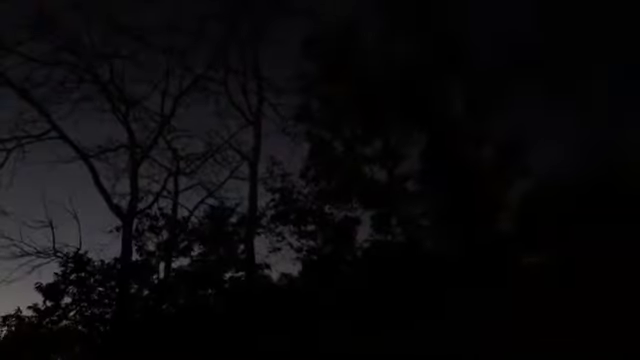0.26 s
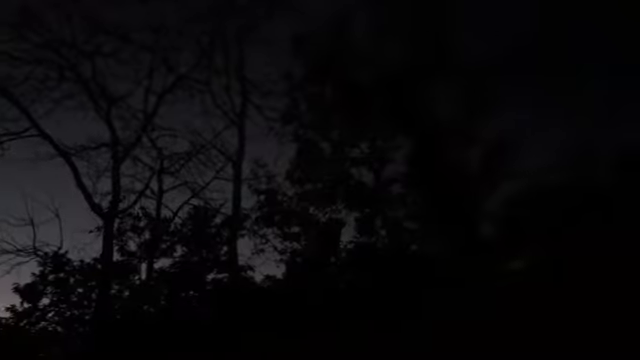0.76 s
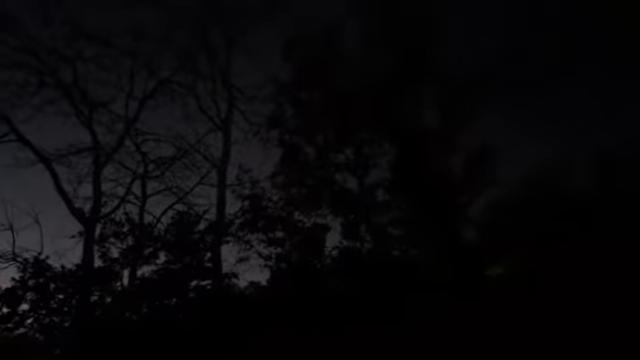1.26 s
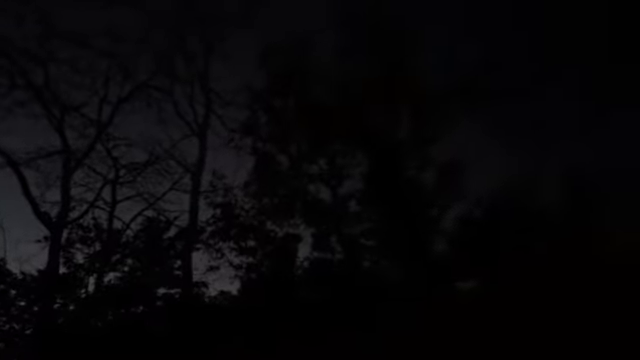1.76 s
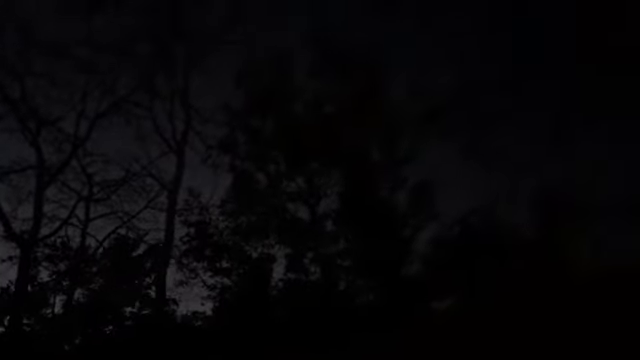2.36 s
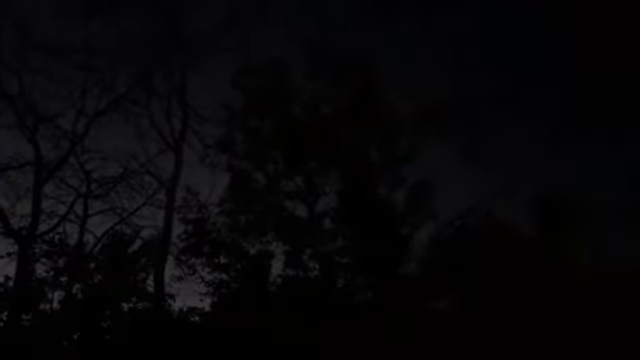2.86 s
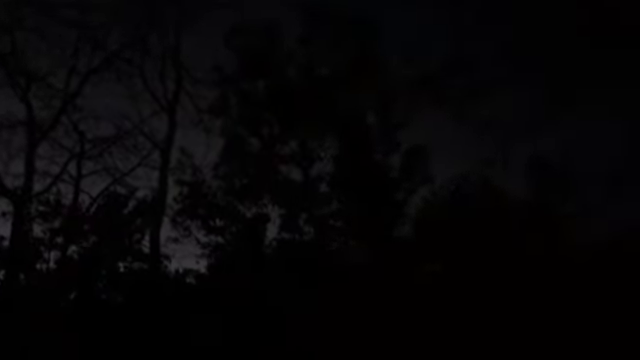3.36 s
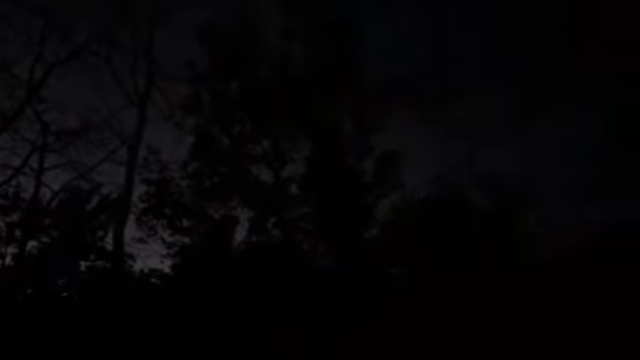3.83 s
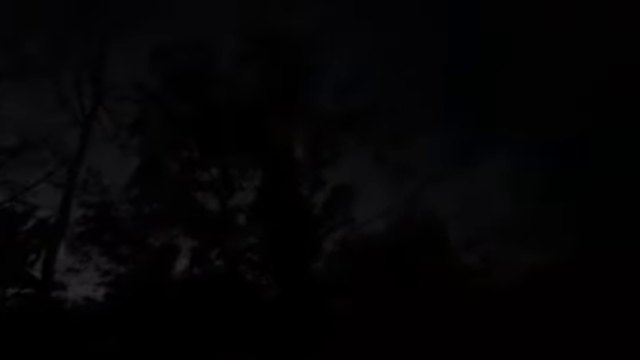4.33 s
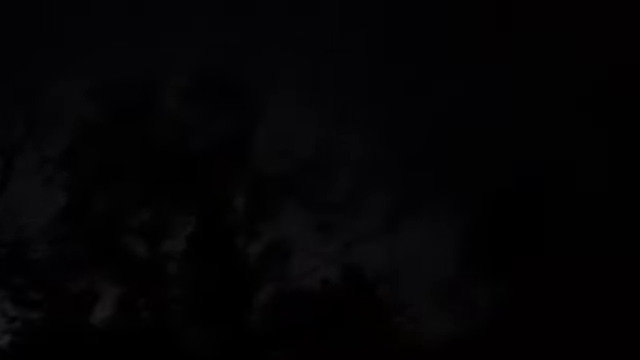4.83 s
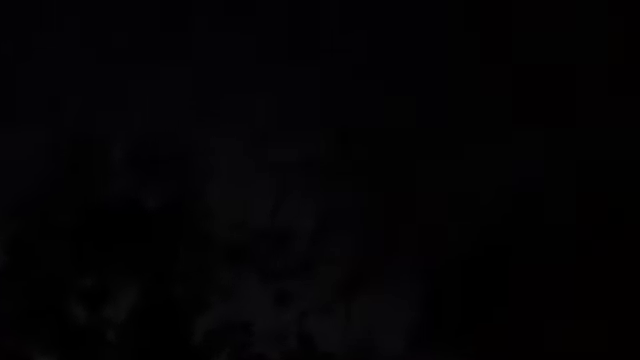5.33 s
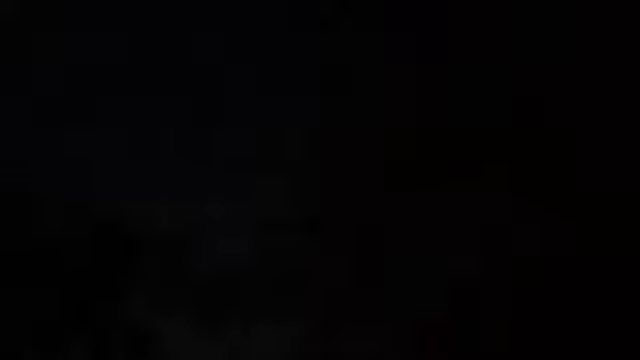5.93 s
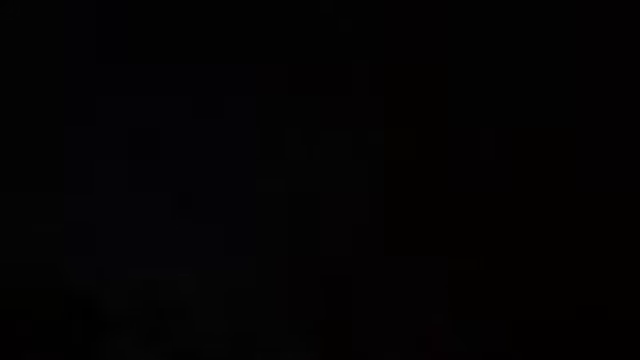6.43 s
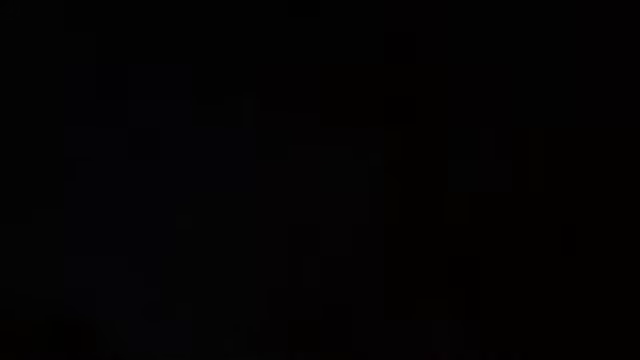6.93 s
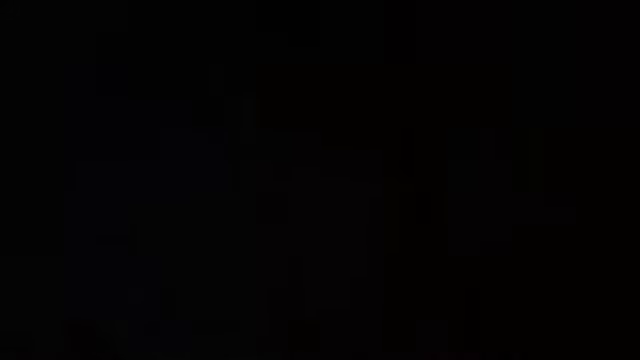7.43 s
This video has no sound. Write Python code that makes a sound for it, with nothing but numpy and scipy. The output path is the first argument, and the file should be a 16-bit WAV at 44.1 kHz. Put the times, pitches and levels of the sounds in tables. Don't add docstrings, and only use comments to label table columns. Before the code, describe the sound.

At night among trees, one owl wails in echoing arcs while a nearer one trills low and a third toots higher, with leaves rustling.

```python
import sys
import numpy as np
from scipy import signal
from scipy.fft import rfft, irfft, next_fast_len
from scipy.io import wavfile
from scipy.ndimage import uniform_filter1d, minimum_filter1d

SR = 44100
rng = np.random.default_rng(int(sys.argv[2]) if len(sys.argv) > 2 else 0)


def inscribe(sig):
    pcm = np.round(np.clip(np.atleast_2d(sig).T, -1, 1) * 32767)
    wavfile.write(sys.argv[1], SR, pcm.astype(np.int16))


def attenuation_scalar(level_db):
    decades = np.asarray(level_db, float) / 20
    return 10 ** decades


N = 339129


def colour(x, points):
    hz, db = np.transpose(points)
    size = next_fast_len(x.shape[-1])
    bins = np.maximum(np.arange(size // 2 + 1) * SR / size, 1)
    gain = attenuation_scalar(np.interp(np.log(bins), np.log(hz), db))
    return irfft(rfft(x, size) * gain, size)[..., :x.shape[-1]]


def unit(x):
    return x / np.sqrt(np.mean(x ** 2))


def walk(rate, size=N):
    k = max(int(SR / rate), 1)
    smooth = uniform_filter1d(rng.standard_normal(N), k, mode="wrap")
    return unit(uniform_filter1d(smooth, k, mode="wrap"))[:size]


def span(table):
    s, *columns = np.transpose(table)
    start = int(s[0] * SR)
    t = np.arange(start, min(int(s[-1] * SR), N)) / SR
    return start, [np.interp(t, s, c) for c in columns]


def spells(table, t):
    return sum(size * np.exp(-((t - s) / max(half, .01)) ** 2) for s, half, size in table)


def wail_partials(hz, db, beak, hoarse, half, shrill):
    second_db, veil_db, fourth_db, step_db, fifth_db = shrill
    second = np.minimum(second_db - 0.7 * (db + 7.5), -3.5) + veil_db * hoarse + 0.3 * beak
    third_db = -23
    partials = [(1, 0.0044), (2, second), (3, third_db + beak)]
    partials += [(.5, half - 24), (1.5, half), (2.5, half - 7 + 0.1 * (860 - hz)), (3.5, half - 36)]
    slack = 0.63 * np.maximum(842 - hz, 0)
    for k in range(4, 11):
        level = third_db + 0.98 * beak + fourth_db + step_db * (k - 4) + fifth_db * (k == 5)
        partials.append((k, level - slack * max(k - 4.8, 0) - 16 * attenuation_scalar(half) * (k - 3.5)))
    return partials


def wails():
    # start_s, pitch_hz, level_db, beak_opening_db
    wail_1 = [(0.125, 817.6, -29, -19), (0.18, 763.6, -16, 2.5), (0.252, 792, -9, 0), (0.37, 848, -9, 0),
              (0.458, 844.7, -5.5, -3.5), (0.549, 846, -12.5, 0.5), (0.702, 800.5, -21, 14.5),
              (0.838, 726, -26, -2.5), (0.961, 696, -44.5, 0)]
    wail_2 = [(3.33, 729, -42, -0.5), (3.392, 744.6, -31.5, -13.5), (3.492, 762.3, -28, 0),
              (3.58, 821, -17.5, -7), (3.651, 869, -11, 0.5), (3.712, 866.4, -15, -2.5),
              (3.8, 836.2, -11.5, 0.5), (3.93, 770.6, -25.5, 12), (4.07, 727, -36.5, -2.5)]
    wail_3 = [(5.76, 750, -42, -16), (5.802, 788, -27.5, -22), (5.898, 772.5, -29, 8.5),
              (5.98, 794.6, -17.5, -3), (6.05, 850.7, -9.5, -1.5), (6.16, 844.4, -10, -4.5),
              (6.27, 793, -19, -2.5), (6.378, 730, -25, 0.5), (6.468, 682, -54, -19)]
    wail_4 = [(7.62, 698, -42.5, -24.5), (7.65, 767, -28, -1.5), (7.69, 771, -22.5, 12)]
    # second_db at full effort, second_when_hoarse_db, fourth_under_third_db,
    # step_to_next_db, fifth_lift_db
    shrill_db = [
        (-22, -8, -11, -5, -2.5),
        (-17, 0, -10.5, -9.5, 8),
        (-17, -3, -9.5, -13.5, 0.5),
        (-18.5, -3, -19.5, -11.5, 0),
    ]
    # resting_doubling_db, far_side_band_share (0-1)
    unsteady = [
        (-54, 0),
        (-39.5, 0.7),
        (-41.5, 0.5),
        (-23.5, 0.5),
    ]
    # centre_s, half_length_s, hoarseness (0-1)
    hoarse_spells = [
        (0.158, 0.028, 1.14),
        (3.38, 0.041, 0.7),
        (3.47, 0.06, 0.4),
        (3.555, 0.046, 0.9),
        (4.07, 0.046, 0.5),
        (5.81, 0.035, 1.1),
        (5.89, 0.049, 0.1),
    ]
    # centre_s, half_length_s, gain_db
    doubling = [
        (0.72, 0.055, 21),
        (3.48, 0.13, 21.5),
        (3.62, 0.039, 27.5),
        (3.68, 0.025, 32.5),
        (5.85, 0.11, 28.5),
    ]
    out = np.zeros(N)
    for rows, shrill, (rest_db, far) in zip((wail_1, wail_2, wail_3, wail_4), shrill_db, unsteady):
        start, (hz, db, beak) = span(rows)
        n = len(hz)
        hz = uniform_filter1d(hz, int(0.04 * SR), mode="nearest")
        t = (start + np.arange(n)) / SR
        hoarse = 0.01 + spells(hoarse_spells, t)
        half = rest_db + spells(doubling, t)
        jitter = 0.0035 * walk(56, size=n) + 0.029 * hoarse * walk(250, size=n)
        phase = 2 * np.pi * np.cumsum(hz * (1 + jitter)) / SR
        voice = np.zeros(n)
        for k, p in wail_partials(hz, db, beak, hoarse, half, shrill):
            flicker_db = 1.51 * min(k - .7, 4) * walk(38, size=n)
            voice += attenuation_scalar(p + flicker_db) * np.sin(k * phase)
        throb = np.sin(phase / 4 + .4 * walk(40, size=n))
        throb = throb + far * np.sin(phase * 3 / 4 + .4 * walk(40, size=n))
        chatter = 1 + hoarse * (.3 * walk(500, size=n) + .8 * throb)
        to_end = np.arange(n)[::-1] + (start + n > N - 9) * n
        fade = np.minimum(1, np.minimum(np.arange(n), to_end) / (0.0051 * SR))
        out[start:start + n] += np.sqrt(2) * attenuation_scalar(db - 0.5) * voice * chatter * fade
    return colour(out, [(450, -24.5), (620, -16.5), (720, -0.5), (900, 0.0), (1020, -3.5), (1300, -2.5),
                        (2100, 0), (2600, 1), (3300, -2.0), (3800, -2.0), (4200, -2.5), (5100, -4.5),
                        (5900, 2), (6800, -1.0), (7600, 3.5)])


def squeak():
    # start_s, pitch_hz, level_db
    squeak_curve = [
        (3.31, 1330, -92),
        (3.33, 1308, -40),
        (3.38, 1338, -45.5),
        (3.45, 1318, -51),
        (3.52, 1322, -53.5),
        (3.58, 1360, -88.5),
    ]
    partials_db = [-2, 1.5, -1.5, -11.5]
    out = np.zeros(N)
    start, (hz, db) = span(squeak_curve)
    phase = 2 * np.pi * np.cumsum(hz * (1 + .014 * walk(400, size=len(hz)))) / SR
    stack = sum(attenuation_scalar(p) * np.sin((k + 1) * phase) for k, p in enumerate(partials_db))
    out[start:start + len(hz)] = attenuation_scalar(db) * stack
    return out


def toots(table, fall, overtone_db, edge, lean):
    out = np.zeros(N + SR)
    for s, db, hz, ms in table:
        reach = int(ms * SR / 1000)
        t = np.arange(-reach, reach) / (ms * SR / 2000)
        phase = 2 * np.pi * np.cumsum(hz * (1 - fall * t - 0.0067 * t ** 2)) / SR
        leaned = (t + lean) / (1 + lean * np.sign(t + lean))
        swell = attenuation_scalar(db - 6.66 * np.abs(leaned) ** edge)
        start = int(s * SR) + SR // 10 - len(t) // 2
        out[start:start + len(t)] += swell * (np.sin(phase) + attenuation_scalar(overtone_db) * np.sin(2 * phase))
    return out[SR // 10:][:N]


def trill(rows, first_hz, last_hz, first_ms, last_ms):
    s, db = np.transpose(rows)
    gap = np.minimum(np.diff(s, prepend=s[0] - .07), .11)
    full_toot_db, flat_hz_per_db, ms_per_gap_s = -22.5, 1.9, 100
    hz = np.interp(s, s[[0, -1]], [first_hz, last_hz]) + flat_hz_per_db * (db - full_toot_db)
    ms = np.interp(s, s[[0, -1]], [first_ms, last_ms]) + ms_per_gap_s * gap
    return list(zip(s, db, hz, ms))


def low_toots():
    # centre_s, peak_db
    trill_1 = [(0.002, -29.5), (0.058, -29.5), (0.125, -26.5), (0.189, -25), (0.25, -26), (0.315, -24.5),
               (0.379, -23.5), (0.437, -29.5), (0.493, -39.5), (0.604, -46), (0.667, -22.5), (0.75, -22.5),
               (0.843, -20), (0.943, -21), (1.048, -21), (1.155, -21.5), (1.265, -23), (1.37, -27.5),
               (1.468, -23.5), (1.544, -24.5), (1.606, -25.5), (1.673, -29), (1.738, -38)]
    trill_2 = [(2.748, -26.5), (2.822, -22.5), (2.894, -20.5), (2.96, -20.5), (3.026, -21.5),
               (3.088, -20.5), (3.153, -22.5), (3.217, -22), (3.28, -22), (3.339, -25.5), (3.397, -34),
               (3.519, -39), (3.571, -29), (3.657, -27.5), (3.751, -31.5), (3.853, -27), (3.965, -36),
               (4.069, -32.5), (4.16, -28.5), (4.264, -27), (4.351, -25.5), (4.418, -25), (4.482, -25.5)]
    trill_3 = [(6.39, -27.5), (6.461, -28), (6.526, -27), (6.589, -24.5), (6.654, -25.5), (6.715, -23),
               (6.777, -24.5), (6.84, -25), (6.899, -26), (6.959, -27), (7.015, -30), (7.068, -29.5),
               (7.132, -24.5), (7.217, -22.5), (7.312, -22), (7.409, -21.5), (7.512, -22.5), (7.613, -24.7)]
    # full_toot_first_hz, full_toot_last_hz, shortest_first_ms, shortest_last_ms
    trill_hz = [
        (614, 640, 21, 24),
        (620.7, 614, 19, 19),
        (626.5, 616, 21, 18),
    ]
    rows = []
    for table, drift in zip((trill_1, trill_2, trill_3), trill_hz):
        rows += trill(table, *drift)
    return toots(rows, fall=0.0096, overtone_db=-29, edge=3.13, lean=-0.068)


def high_toots():
    # centre_s, peak_db, pitch_hz, length_ms
    high_rows = [(0.07, -28, 788, 26), (0.907, -18, 794, 27.0), (1.012, -18, 826.6, 37),
                 (1.123, -17.5, 819, 45.0), (1.23, -19, 807, 42), (1.322, -19.5, 798, 35),
                 (1.39, -18.5, 815, 27), (1.455, -22, 814, 35), (1.518, -24, 815, 21.0),
                 (1.581, -27.5, 809, 32), (1.66, -31.5, 731, 110), (4.309, -21.5, 897, 12),
                 (4.335, -23.5, 918, 20), (4.706, -16, 896, 47), (5.009, -14.5, 902, 38),
                 (5.284, -18, 899, 32.0), (5.522, -29, 912, 22), (5.735, -24, 881, 38),
                 (5.89, -17.5, 873, 21)]
    return toots(high_rows, fall=0.016, overtone_db=-34.5, edge=2.0, lean=0.3)


def wood(x, wet_db):
    # t60_s, share_db
    decays = [
        (.12, 2),
        (.9, -10.5),
        (2.4, -14.5),
    ]
    t = np.arange(3 * SR) / SR
    scatter = rng.standard_normal(len(t)) * np.clip((t - .012) / 0.0057, 0, 1)
    power = sum(attenuation_scalar(2 * db) * attenuation_scalar(-120 * t / t60) * np.log(1000) * 2 / t60 / SR for t60, db in decays)
    echo = signal.fftconvolve(x, scatter * np.sqrt(power))[:N]
    echo = colour(echo, [(900, -2.5), (1700, -6.5), (2500, -5), (3300, -5.5), (5000, -0.5)])
    return x + attenuation_scalar(wet_db) * echo


def ticks():
    # start_s, peak_db
    snaps = [
        (4.7398, -37.5),
        (4.7546, -30.5),
    ]
    out = np.zeros((2, N))
    t = np.arange(200) / SR
    for s, db in snaps:
        start = int(s * SR)
        out[:, start:start + 200] += attenuation_scalar(db + 3.5) * rng.standard_normal((2, 200)) * np.exp(-t / .0007)
    return colour(out, [(1500, 1), (4000, -4)])


def breeze():
    # time_s, strength_db
    strength = [(0, -7.5), (1.0, -9), (2.0, -5.5), (2.4, -4.5), (2.87, 2.5), (3.28, 0), (3.68, 1.5),
                (4.05, -0.5), (5.3, 3.5), (5.63, 9), (6.0, 7.5), (6.53, 6.5), (6.9, 4.5), (7.69, -3)]
    return np.interp(np.arange(N) / SR, *np.transpose(strength))


def wind():
    # (positive leans left; the port gains squash it, 36.5 gives
    # about 8 dB between the channels)
    buffets = [(0.078, -34.5, 0.064, 18.5), (0.361, -42, 0.06, 11.5), (0.814, -52.5, 0.035, -7.5),
               (1.052, -46, 0.024, -13.5), (0.59, -57, 0.06, 18), (1.22, -49.5, 0.084, 7),
               (3.543, -51.5, 0.051, 11), (5.313, -53, 0.055, 3), (6.672, -50, 0.04, 17),
               (1.688, -42.5, 0.05, 20.5), (2.126, -55.5, 0.07, -19), (2.434, -46.5, 0.08, 36.5),
               (2.68, -45, 0.06, 8.5), (2.84, -42.5, 0.039, 10), (2.987, -47, 0.05, -9.5),
               (3.418, -48, 0.055, 17.5), (3.63, -39, 0.07, 26.5), (3.828, -54, 0.069, 3),
               (3.989, -47.5, 0.04, 4), (5.825, -42, 0.02, 7), (5.98, -42.5, 0.058, 1),
               (6.247, -46, 0.24, -0.5), (6.85, -37.5, 0.023, -9), (7.026, -38.5, 0.1, 15.5),
               (7.292, -45, 0.35, -1), (7.566, -44, 0.048, 21), (7.666, -37, 0.083, 7)]
    # frequency_hz, density_db
    wind_tone = [(12, -37.5), (30, -14), (55, -4), (90, 1), (200, -6), (350, -12), (600, -13.5),
                 (1200, -47.5)]
    hop = 64
    t = np.arange(0, N, hop) / SR
    lull = attenuation_scalar(-56.5 + 0.82 * breeze()[::hop])
    gust = lull + spells([(s, half, attenuation_scalar(db)) for s, db, half, _ in buffets], t)
    pan_db = (2.2 * lull + spells([(s, half, attenuation_scalar(db) * pan) for s, db, half, pan in buffets], t)) / gust
    gust, pan_db = (np.interp(np.arange(N) / SR, t, c) for c in (gust, pan_db))
    flutter = attenuation_scalar(np.array([6.1 * walk(22), 4.0 * walk(30)]))
    thumps = unit(colour(rng.standard_normal((2, N)) * flutter, wind_tone))
    ports = np.sqrt(2 / (1 + attenuation_scalar(0.45 * np.array([-pan_db, pan_db]))))
    return attenuation_scalar(3.0) * gust * ports * thumps


def night():
    # frequency_hz, density_db
    night_mid = [(35, -31.5), (60, -13), (129, -7), (187, -2.5), (334, -1), (485, -6.5), (570, -4.5),
                 (1120, -13), (1230, -13), (1620, -16.5), (1740, -14), (2140, -12), (2520, -14.5),
                 (2700, -19), (15400, -33)]
    # frequency_hz, gain_db
    treble_ripple = [(3000, -1), (4500, 0.7), (6500, 2), (7800, -2), (12000, 2.25), (15000, 0.5)]
    # frequency_hz, side_minus_mid_db
    night_side = [(60, -17), (110, -18), (200, -16.5), (380, -11), (700, -11.5), (1290, 3.5), (2380, -1.5),
                  (4400, 1.5), (8120, 0), (15000, 1)]
    carry = [
        0.45,
        0.62,
        0.84,
    ]
    # centre_s, half_length_s, gain_db
    rustles = [
        (2.75, 0.22, 1),
        (4.55, 0.15, 1.5),
        (5.62, 0.15, 3),
        (6.62, 0.15, 2),
        (7.0, 0.15, 1.5),
        (7.45, 0.1, 3.5),
    ]
    t = np.arange(N) / SR
    levels = np.outer(carry, breeze())
    levels[1:] += spells(rustles, t) * np.array([[0.4], [1.0]])
    car_s, car_db, car_rise_s = 7.4, 6.5, 0.82
    levels[0] += car_db / (1 + np.exp((car_s - t) / car_rise_s))
    mid, side = colour(colour(rng.standard_normal((2, N)), night_mid), treble_ripple)
    pair = mid + colour(side, night_side) * np.array([[1], [-1]])
    out, below = 0, 0
    for k, hz in enumerate(150 * 2. ** np.arange(8)):
        upto = colour(pair, [(hz, 0), (hz * 1.3, -40)]) if k < 7 else pair
        share = [np.interp(np.log(hz), np.log([1200, 5000, 12000]), row) for row in np.eye(3)]
        out = out + (upto - below) * attenuation_scalar(share @ levels + 1.3 * walk(7.3) + 0.6 * walk(0.5))
        below = upto
    return attenuation_scalar(-42.5) * unit(out)


def scene():
    high = high_toots()
    owls = wood(wails() + squeak() + 0.13 * high, wet_db=3.0)
    owls = owls + 0.58 * high + wood(low_toots(), wet_db=-12.5)
    return owls + ticks() + wind() + night()


def low_pass(x):
    return signal.sosfilt(signal.butter(12, 15710, fs=SR, output="sos"), x)


def record(dry):
    crest = np.abs(dry).max(axis=0) + 1e-9
    calm = minimum_filter1d(np.minimum(1, .59 / crest), 300)
    mix = dry * uniform_filter1d(calm, 300) ** 0.72
    return low_pass(mix)


dry = scene()
out = record(dry)
inscribe(out)
```